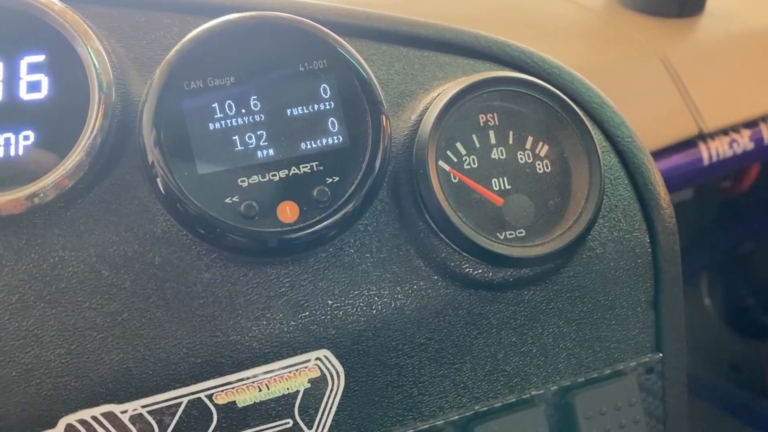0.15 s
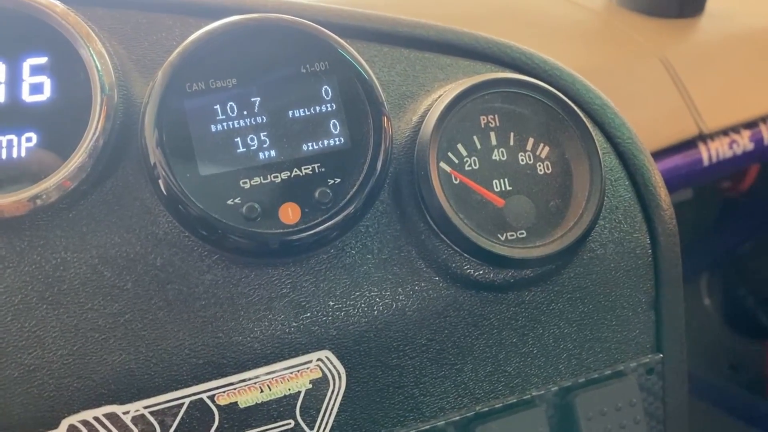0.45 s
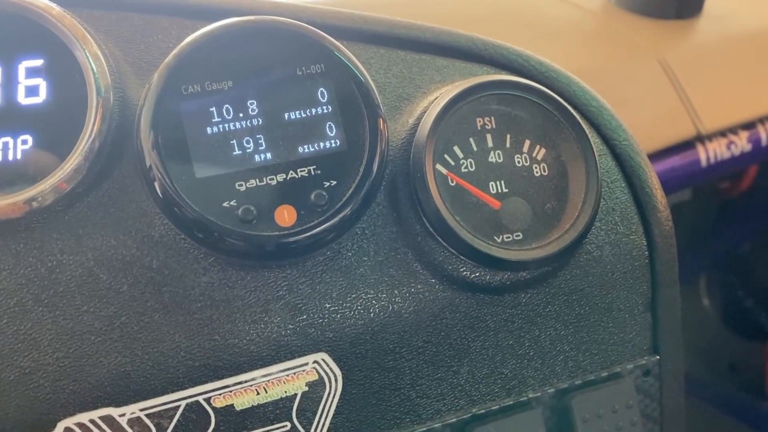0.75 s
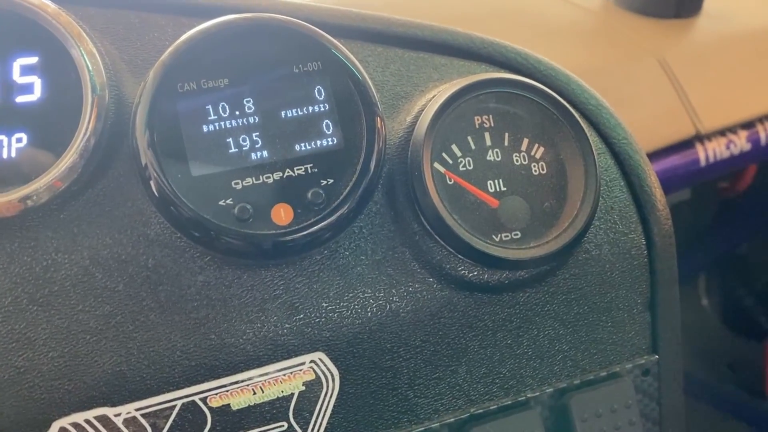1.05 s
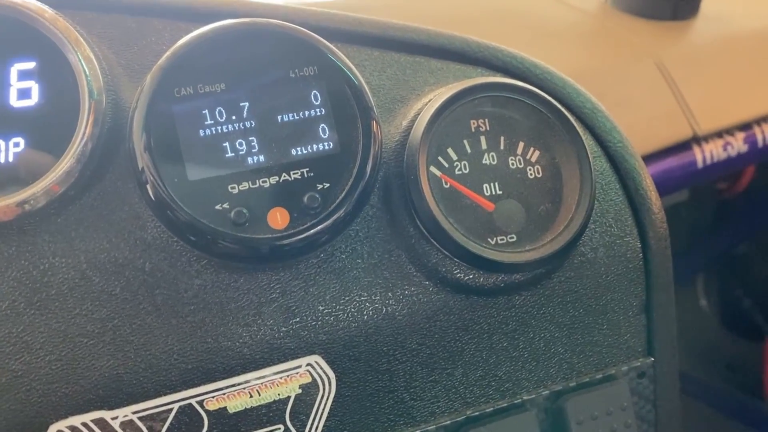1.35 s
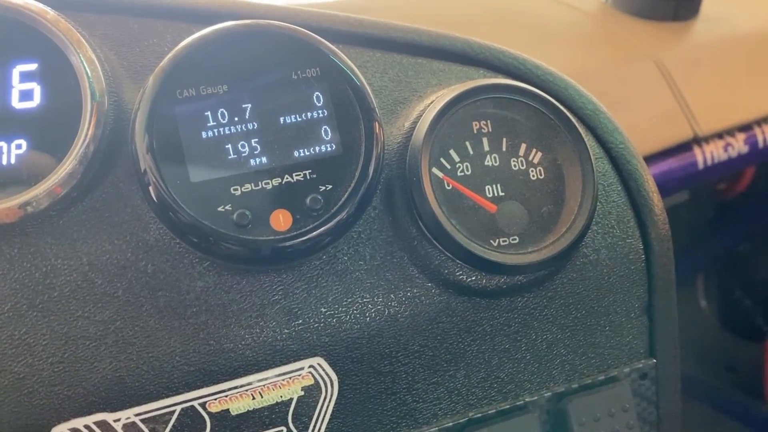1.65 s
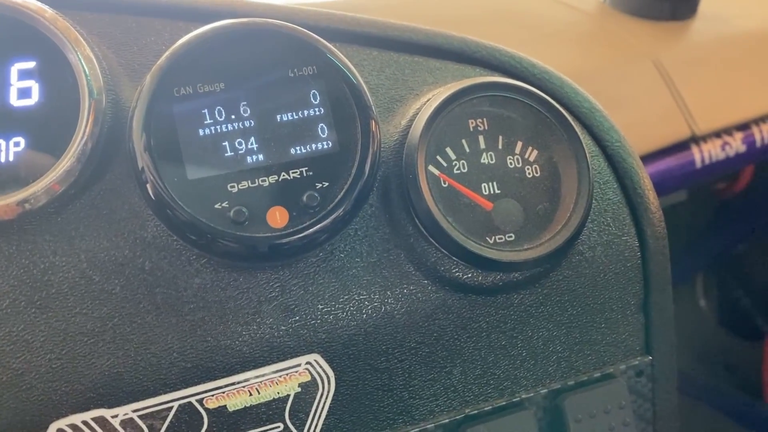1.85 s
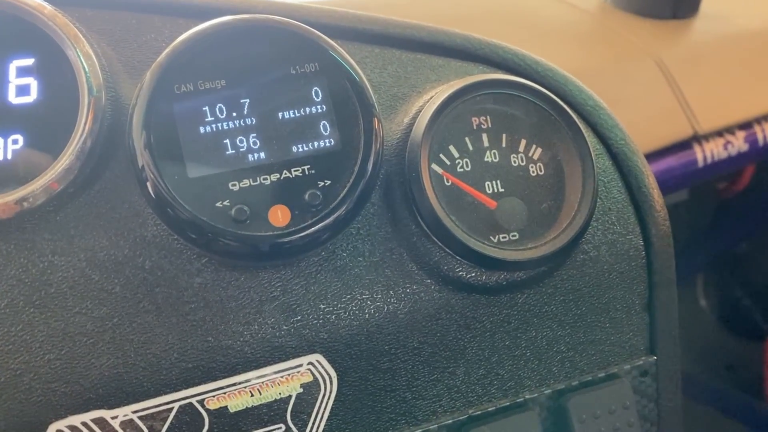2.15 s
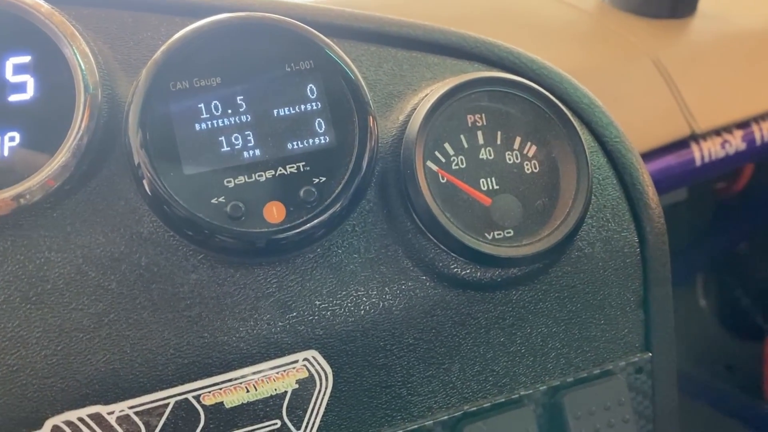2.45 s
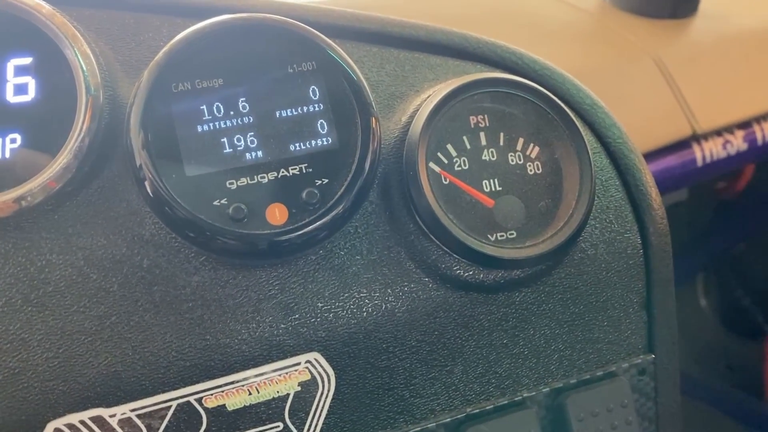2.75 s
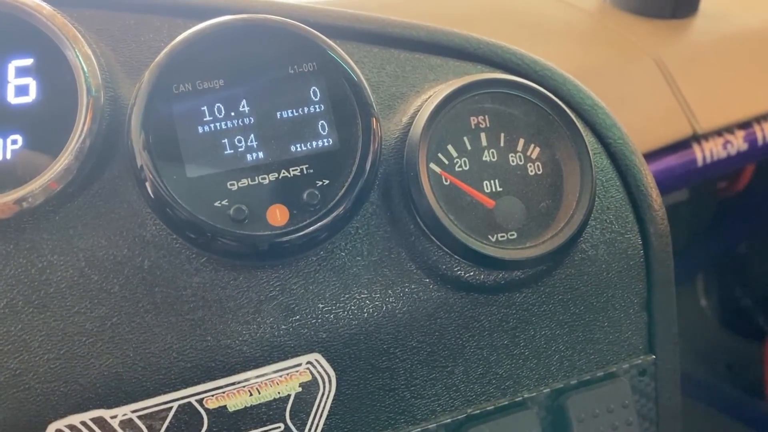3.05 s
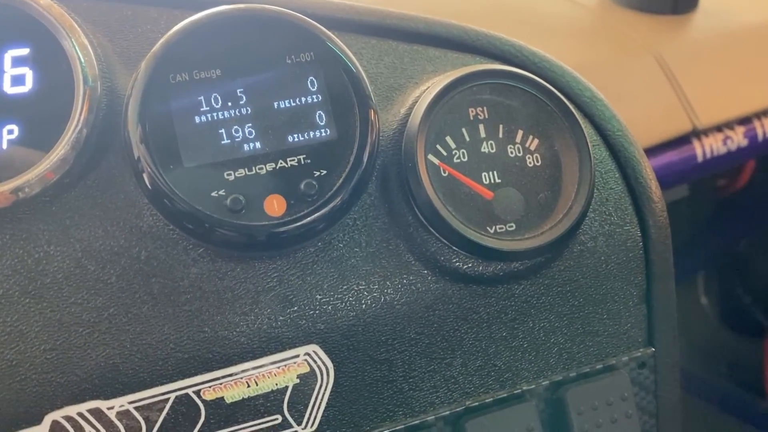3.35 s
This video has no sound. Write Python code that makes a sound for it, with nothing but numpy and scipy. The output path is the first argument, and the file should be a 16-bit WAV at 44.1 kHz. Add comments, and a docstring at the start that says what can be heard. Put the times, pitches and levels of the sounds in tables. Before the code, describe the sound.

A starter motor turns over a six-cylinder car engine in fast, even chugs that never catch, with deep throbbing, metallic clatter and a faint whirr, heard close in stereo in a small, dull-sounding garage.

```python
"""In a garage a starter cranks a six-cylinder engine at about 195 rpm; it does not fire.
Air puffs, two per stroke, excite decaying pipe modes, and short low surges return in every cycle.
Gears and valve train clatter after each compression: random impacts drive resonances of engine and
panels, while blows ring the block. The starter's shaped noise whirrs and whines underneath."""
import sys
import numpy as np
from scipy import signal
from scipy.fft import rfft, irfft
from scipy.io import wavfile
from scipy.ndimage import uniform_filter1d

SR = 44100
rng = np.random.default_rng(int(sys.argv[2]) if len(sys.argv) > 2 else 0)


def digitize_waveform(pressure):
    """Quantize a signal to 16-bit integers and store it at the path in sys.argv[1].

    Rows of a 2-D input are taken as channels; values are limited to [-1, 1].
    """
    field = np.atleast_2d(pressure).T
    bounded = np.clip(field, -1, 1)
    quanta = np.round(bounded * 32767).astype(np.int16)
    wavfile.write(sys.argv[1], SR, quanta)


N = 154350
T = np.arange(N) / SR  # s

CYCLES, CYCLE_S, FIRST_CYCLE_S = 8, .6142, -.8184  # one cycle is two crank turns
MODE_WANDER = 0.0086  # spread of a mode's frequency from stroke to stroke, as a share
COLOUR_SPREAD_DB = 2  # spread of a mode's weight from stroke to stroke

# compression strokes: (time [s], relative clatter level [dB], relative thud level [dB])
STROKES = [(0.015, -12, -21), (0.121, -12.5, -20), (0.225, -10, -24.5), (0.32, -11, -23),
           (0.429, -8, -19.5), (0.521, -12.5, -20), (0.631, -11, -22.5), (0.733, -11, -19),
           (0.842, -10.5, -21), (0.935, -11.5, -20.5), (1.043, -10.5, -19), (1.139, -12.5, -20.5),
           (1.254, -12.5, -23), (1.359, -11.5, -23.5), (1.455, -12, -20.5), (1.55, -11, -21),
           (1.662, -9.5, -18), (1.752, -12, -20.5), (1.863, -12.5, -20.5), (1.975, -11, -21.5),
           (2.072, -10.5, -26), (2.164, -11, -25), (2.274, -9.5, -15), (2.36, -12, -20),
           (2.476, -11.5, -21), (2.579, -10, -21.5), (2.684, -10, -22), (2.783, -11.5, -22),
           (2.887, -9.5, -16), (2.975, -12.5, -21.5), (3.089, -11.5, -22.5), (3.191, -10, -22),
           (3.302, -10.5, -22.5), (3.391, -12, -22)]
# the six cylinders in firing order: (rise [ms], onset to start of fall [ms], knock at onset [dB],
# then weight of each of the three block modes [dB])
CYLINDERS = [(4, 37, 3, -4, 0.5, -9), (3.3, 30, 24, -4.5, 1.5, -3.5), (21, 45, 15, 1, -0.5, 2.5),
             (8.8, 37.2, 19, -2.5, 1.5, 3), (6.5, 24.3, -17, -5.5, 0, -1.5), (18.6, 55.5, 17, -3, -1, -2)]


def amp(db):
    """Amplitude ratio: 20 dB is a factor of ten."""
    return 10 ** (np.asarray(db) / 20)


def evened(x):
    """Normalisation to unit root-mean-square."""
    return x / np.sqrt(np.mean(x ** 2) + 1e-20)


def read(points, hz):
    """Interpolation of a curve along logarithmic frequency."""
    f, value = np.transpose(points)
    return np.interp(np.log(hz + 1), np.log(f + 1), value)


def coloured(x, points):
    """Linear filtering: the spectrum is multiplied by a curve given in dB."""
    hz = np.fft.rfftfreq(N, 1 / SR)
    return irfft(rfft(x) * amp(read(points, hz)), N)


def by_stroke(table):
    """Periodic firing order: a per-cylinder table repeats along the strokes."""
    # the first row serves the time before the first stroke
    return np.array(table)[np.arange(-1, len(STROKES)) % len(table)]


def ring(x, modes, spread_db, favour_db=0, wander=MODE_WANDER):
    """Modal superposition: x drives resonances, reweighted and slightly retuned for each stroke."""
    stroke = np.searchsorted([row[0] - .01 for row in STROKES], T)  # changes 10 ms ahead of the stroke
    weight_db, shift = rng.standard_normal((len(STROKES) + 1, len(modes), 2)).T
    weight = amp(favour_db + spread_db * weight_db.T)
    out = 0
    for k, (hz, width, db) in enumerate(modes):
        r = np.exp(-np.pi * width / SR)
        glide = uniform_filter1d(hz * (1 + wander * shift[k, stroke]), size=1500)
        turn = np.exp(2j * np.pi * np.cumsum(glide) / SR)
        # shift the mode down to 0 Hz, low-pass it to its width, shift it back
        shifted = x * weight[stroke, k] / turn
        smooth = signal.lfilter([np.sqrt(1 - r * r)], [1, -r], shifted)
        out = out + (-1) ** k * amp(db) * (turn * smooth).real
    return evened(out)


def boom():
    """Free decay of pipe modes: every air puff swells softly and rings the pipes."""
    # the twelve puffs of a cycle, one every 60 crank degrees:
    # (lateness [ms], lower-mode level [dB], upper-mode level [dB])
    puffs = [(-1.1, -9.6, -12.3), (0.9, -10.1, -8.0), (-2.1, -13.8, -6.7), (-2.0, -9.9, -10.0),
             (2.2, -12.2, -12.8), (1.2, -11.2, -0.0), (0.3, -15.3, -7.5), (1.7, -24.6, -0.6),
             (0.8, -20.3, -1.0), (-1.2, -5.7, -35.0), (5.3, -35.0, -8.7), (-4.7, -16.0, -3.5)]
    # pipe modes, lower first: (frequency [Hz], level [dB], decay by 60 dB [s])
    pipe_modes = [(59.3, -0.1, 0.45), (68.9, 0.1, 0.15)]
    # slow drift of the crank speed: (time [s], lag [ms])
    drift = [(0.1, -1.9), (0.51, -1.7), (0.92, 0.2), (1.34, 1.8), (1.75, 0.8), (2.16, 0.9), (2.58, 1.0),
             (2.99, -0.9), (3.4, -1.4)]
    gain_db, rise_s = 0.5, .028
    spread_db, spread_ms = .4, .2  # from puff to puff
    slow = T[::8]
    chance = rng.standard_normal((CYCLES, len(puffs), 2))
    out = 0
    for cycle in range(CYCLES):
        for k, (late_ms, low_db, upper_db) in enumerate(puffs):
            wobble_db, wobble_ms = chance[cycle, k] * (spread_db, spread_ms)
            start = FIRST_CYCLE_S + (cycle + k / len(puffs)) * CYCLE_S
            lag_ms = np.interp(start, *np.transpose(drift))
            start += (late_ms + wobble_ms + lag_ms) / 1000
            t = np.maximum(slow - start, 0)
            low, upper = (amp(db - 60 * t / t60) * np.sin(2 * np.pi * hz * t)
                          for hz, db, t60 in pipe_modes)
            swell = amp(wobble_db) * np.sin(np.pi / 2 * np.minimum(t / rise_s, 1)) ** 2
            out = out + swell * (amp(low_db) * low + amp(upper_db) * upper)
    return amp(gain_db) * signal.resample_poly(out, up=8, down=1)[:N]


def surges():
    """Gaussian tone pulses: brief low swells slide downwards at the same times in every cycle."""
    # surges of a cycle: (centre after cycle start [s], frequency at centre [Hz], level [dB])
    surge_list = [(.047, 99.5, -11.5), (.13, 83, -31), (.215, 98, -19.5), (.275, 88, -38),
                  (.335, 96, -20.5), (.445, 123, -18), (.585, 113, -23.5)]
    width_s, slide_hz_per_s = 0.0095, -200  # width is the standard deviation
    slow, out = T[::8], 0
    for cycle in range(CYCLES):
        for s, hz, db in surge_list:
            t = slow - FIRST_CYCLE_S - cycle * CYCLE_S - s
            tone = np.sin(2 * np.pi * (hz + slide_hz_per_s * t / 2) * t)
            out = out + amp(db) * np.exp(-(t / width_s) ** 2 / 2) * tone
    return signal.resample_poly(out, up=8, down=1)[:N]


def whirr():
    """Filtered noise: the starter's steady, fluttering hiss with a few fuzzy resonant whine bands."""
    # broad colour: (frequency [Hz], relative spectral level [dB])
    whirr_colour = [(40, -32), (70, 2), (130, -1), (190, -3), (302, -8.5), (731, -18.5), (1340, -10.5),
                    (2120, -18.5), (3500, -20.5), (5600, -23), (6300, -28), (7820, -37.5), (11500, -28),
                    (13500, -43.5), (16000, -48)]
    # whine bands: (frequency [Hz], width [Hz], relative level [dB])
    whine_modes = [(3115, 28, -64), (4050, 13, -55), (4760, 120, -51), (5380, 22, -46.5), (6080, 27, -67.5),
                   (7160, 420, -46)]
    whirr_db, whine_db, flutter_db, whine_wander = -27.5, -41.5, 0.8, .003
    flutter = evened(uniform_filter1d(rng.standard_normal(N), size=500))
    noise = rng.standard_normal(N) * amp(flutter_db * flutter)
    broad = evened(coloured(noise, whirr_colour))
    whine = ring(noise, whine_modes, COLOUR_SPREAD_DB, wander=whine_wander)
    return amp(whirr_db) * broad + amp(whine_db) * whine


def stroke_level(column, fall_db_per_s, knock):
    """Addition of powers: each stroke rises, holds and falls away in its cylinder's manner."""
    early = 0.95  # share of the rise that comes before the stroke time
    knock_fade_ms = 4.6  # time constant of the knock's dB
    power, slow = 0, T[::32]
    for k, row in enumerate(STROKES):
        rise_ms, hold_ms, knock_db = CYLINDERS[k % len(CYLINDERS)][:3]
        ms = np.maximum(1000 * (slow - row[0]) + early * rise_ms, 0)
        fall_db = fall_db_per_s * np.maximum(ms - hold_ms, 0) / 1000
        extra_db = knock * knock_db * np.exp(-ms / knock_fade_ms)
        rise = np.minimum(ms / rise_ms, 1)
        power = power + (rise * amp(row[column] - fall_db + extra_db)) ** 2
    return evened(np.interp(T, slow, np.sqrt(power)))


def ticks():
    """Random impulse train: dense small impacts of uneven size and either sign."""
    ticks_per_s, spread_db = 2500, 3.5
    size_draw, time_draw, sign_draw = rng.random((N, 3)).T
    size = amp(-spread_db * np.log(size_draw + 0.0071))
    return size * (time_draw < ticks_per_s / SR) * np.sign(sign_draw - .5)


def knocks():
    """Exponential decay of noise: each single knock is a short sharp burst."""
    # the clearest knocks in the clatter: (time [s], level [dB])
    knock_list = [(0.015, -13), (0.12, -14), (0.148, -7), (0.227, -9.5), (0.318, -10), (0.328, -20),
                  (0.432, -8.5), (0.633, -11.5), (0.735, -11.5), (0.843, -7.5), (0.937, -11), (1.043, -15),
                  (1.073, -6), (1.141, -4.5), (1.256, -6), (1.36, -10.5), (1.457, -6.5), (1.547, -15),
                  (1.662, -7.5), (1.75, -12), (1.864, -6.5), (1.974, -9), (2.072, -5), (2.162, -12),
                  (2.277, -9.5), (2.362, -11), (2.39, -6.5), (2.476, -10.5), (2.579, -9.5), (2.684, -13),
                  (2.784, -14), (2.888, -15), (2.98, -6.5), (3.092, -13), (3.192, -6), (3.305, -4),
                  (3.388, -12)]
    t60 = 0.027  # s
    t, starts = np.arange(2000) / SR, np.zeros(N)
    for s, db in knock_list:
        starts[int(s * SR)] = amp(db)
    envelope = abs(signal.oaconvolve(starts, amp(-60 * t / t60))[:N])
    return rng.standard_normal(N) * envelope


def clatter(knocked, level, hits):
    """Impact excitation: blows after each compression ring engine and panels, with a broad rattle."""
    # engine and panel modes: (frequency [Hz], width [Hz], relative level [dB])
    body_modes = [(358, 22, -6), (491, 24, -6), (604, 40, -8), (664, 30, -4), (734, 30, -2), (887, 35, -8),
                  (986, 32, -6), (1076, 30, -8), (1144, 24, -5), (1226, 24, -9), (1313, 26, -6),
                  (1730, 28, -10), (2326, 20, -14), (2660, 40, -16)]
    # one row per cylinder in firing order: (weight of each of those modes [dB], ...)
    body_favour = [(-1.5, 7.5, 7, 4, -0.52, -0.05, -0.48, -7, -4.5, -16, 0.7, 0.23, -2.1, -0.69),
                   (2.5, -2, 2, 4.5, 0.36, -0.24, 1.4, -13, -5.5, -6, -1.0, 0.59, -2.7, 0.4),
                   (0.5, 0.5, -30, 3.5, -1.8, -1.0, -1.4, 3, 1.0, 4.5, 1.0, -0.44, 3.4, 0.3),
                   (2.5, -3.5, 2.0, 6, 0.6, -2.2, -1.0, 6, -8, 13, -0.47, -0.66, 0.063, 0.67),
                   (-6, 7, -34, -9, 1.0, 2.0, -0.18, -2, -6, 12, -0.16, 1.0, -1, 0.51),
                   (2.5, -1.5, -2.5, 7, -1.2, -1.2, 1.7, 8, 2, 12, -0.0, 0.2, -0.65, 0.28)]
    # broad colour of the rattle: (frequency [Hz], relative spectral level [dB])
    rattle_colour = [(200, -23), (400, -1.5), (750, 0.5), (1350, -1), (2100, -11.5), (2600, -10.5),
                     (3500, -17.5), (5300, -18.5), (7500, -28.5), (12000, -32.5), (16000, -78)]
    body_db, rattle_db = -24.5, -24
    hits_into_body_db, hits_into_rattle_db = 13, 3
    drive = ticks()
    body_drive = drive * knocked + amp(hits_into_body_db) * hits
    body = ring(body_drive, body_modes, COLOUR_SPREAD_DB, by_stroke(body_favour))
    rattle_drive = drive * level + amp(hits_into_rattle_db) * hits
    rattle = evened(coloured(rattle_drive, rattle_colour))
    return amp(body_db) * body + amp(rattle_db) * rattle


def thud(level):
    """Impulse response: blows on each stroke ring the block, each cylinder favouring its own modes."""
    # low block modes: (frequency [Hz], width [Hz], relative level [dB])
    block_modes = [(184.5, 20.6, 2), (229.5, 22, -1), (286.7, 32, -8)]
    # a blow and two after-blows per stroke: (delay [s], relative level [dB])
    blow_list = [(.003, 3), (0.0194, 1.5), (.042, -2)]
    thud_db, shudder_db = -29, -3  # the shudder is loose rattle, relative to the blows
    favour_db = by_stroke(CYLINDERS)[:, 3:]
    blows = np.zeros(N)
    for s, _, stroke_db in STROKES:
        for delay_s, db in blow_list:
            blows[int((s + delay_s) * SR)] += amp(stroke_db + db)
    shudder = ring(ticks() * level, block_modes, 1, favour_db)
    return amp(thud_db) * (ring(blows, block_modes, 1, favour_db) + amp(shudder_db) * shudder)


def garage(x):
    """Reverberation: sparse, dull, decaying reflections at other random times for each call."""
    t60, top_hz = 0.16, 2560  # decay by 60 dB [s], low-pass corner
    at = np.arange(100, 16000, 20)
    taps = np.zeros(16100)
    size = amp(-60 * at / SR / t60)
    taps[at + rng.integers(0, 20, len(at))] = rng.choice([-1., 1.], len(at)) * size
    taps = signal.lfilter(*signal.butter(2, top_hz, fs=SR), taps)
    return signal.fftconvolve(x, taps / np.linalg.norm(taps))[:N]


def scene():
    """Partial coherence: an independent second sounding joins on the right where likeness is low."""
    # likeness of right to left, clipped to -1..1: (frequency [Hz], likeness [ratio])
    likeness = [(60, 0.5), (130, 1.25), (290, 0.47), (640, 0.39), (1410, 0.16), (3100, 0.35), (6820, 0.93),
                (9000, 1), (15000, -2.5)]
    # level of left over right: (frequency [Hz], level [dB])
    left_over_right = [(60, -.7), (200, 0.8), (380, -2.5), (700, -4), (1290, -1.5), (2380, -1), (4400, -6),
                       (8120, -3), (15000, 3)]
    garage_db, left_lag_s = -11, 2.3e-5
    clatter_fall, thud_fall = 264, 211  # dB per s
    low = rfft(boom() + surges())
    knocked = stroke_level(column=1, fall_db_per_s=clatter_fall, knock=True)
    rattle = stroke_level(column=1, fall_db_per_s=clatter_fall, knock=False)
    shudder = stroke_level(column=2, fall_db_per_s=thud_fall, knock=True)
    hits = knocks()
    soundings = [clatter(knocked, rattle, hits) + thud(shudder) + whirr() for _ in range(2)]
    near, other = (rfft(x + amp(garage_db) * garage(x)) for x in soundings)
    hz = np.fft.rfftfreq(N, 1 / SR)
    same = np.clip(read(likeness, hz), -1, 1)
    tilt = amp(read(left_over_right, hz) / 2)
    right = same * near + np.sqrt(1 - same ** 2) * other + low
    left = (near + low) * np.exp(-2j * np.pi * hz * left_lag_s)
    return np.array([irfft(left * tilt, N), irfft(right / tilt, N)])


def record(dry):
    """Saturation between filters: the microphone drops deep bass and rounds peaks; treble is cut."""
    low_hz, ceiling, edge_hz = 45, 1.1, 15900
    thin = signal.lfilter(*signal.butter(2, low_hz, "high", fs=SR), dry)
    soft = ceiling * np.tanh(thin / ceiling)
    band_limit = signal.firwin(511, edge_hz, window=("kaiser", 9), fs=SR)
    return signal.oaconvolve(soft, band_limit[None], "same")


dry = scene()
out = record(dry)
digitize_waveform(out)
```